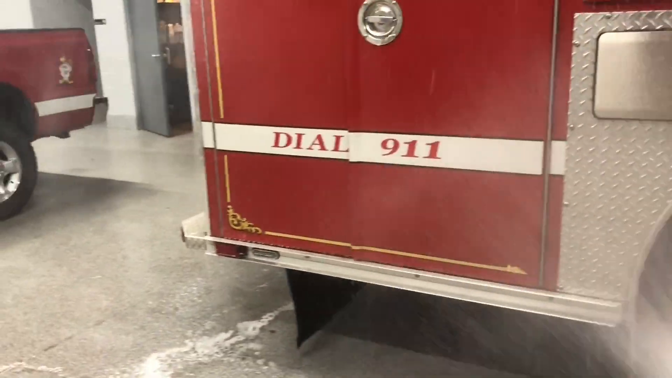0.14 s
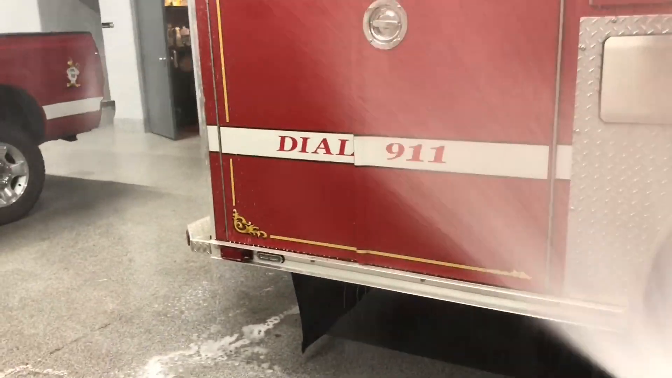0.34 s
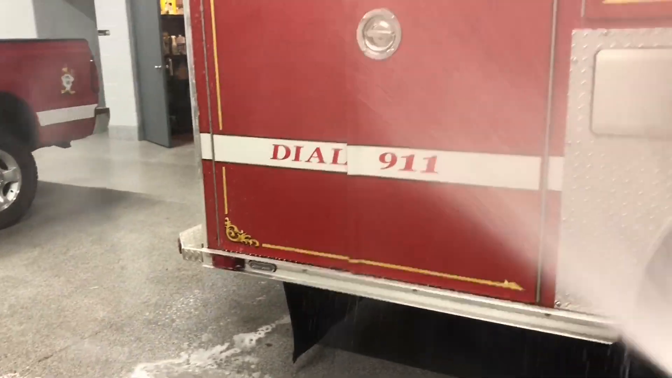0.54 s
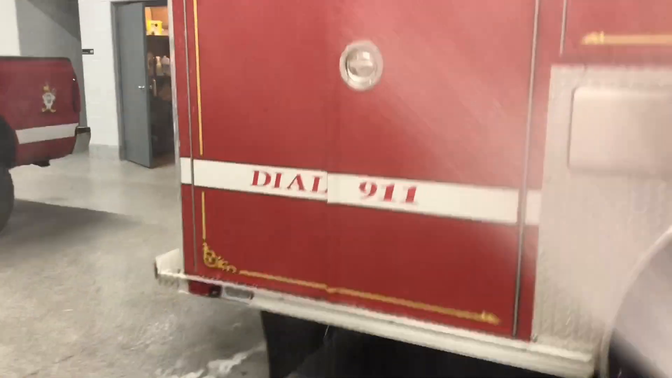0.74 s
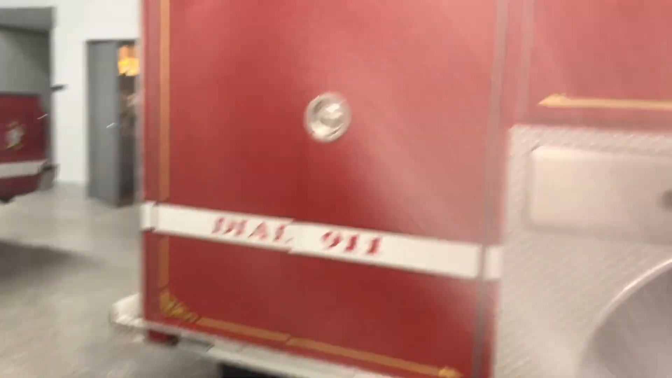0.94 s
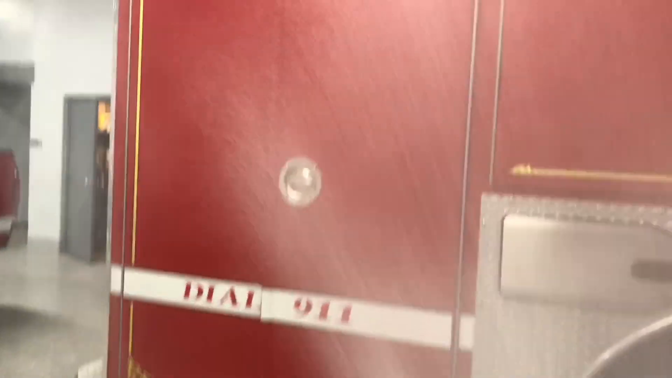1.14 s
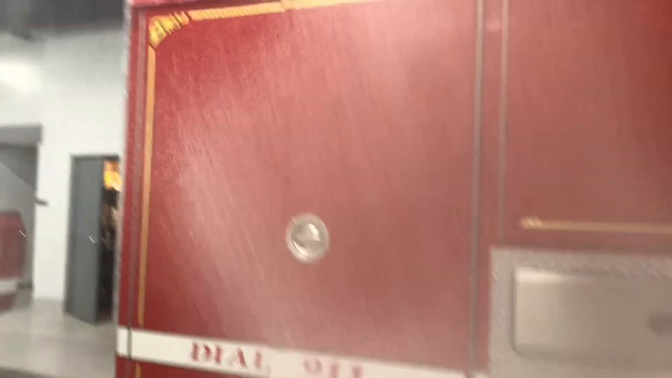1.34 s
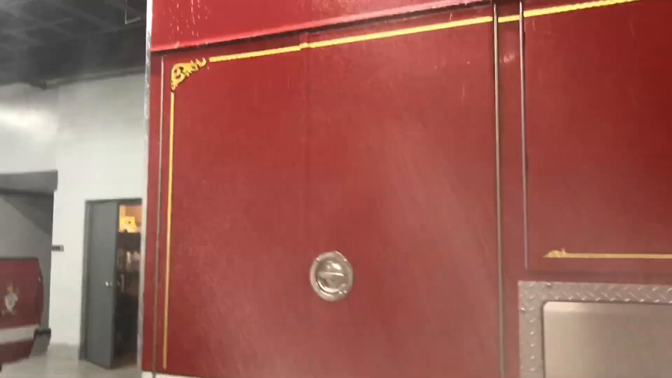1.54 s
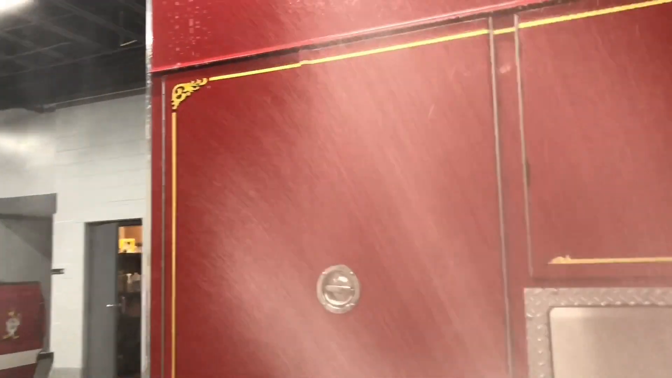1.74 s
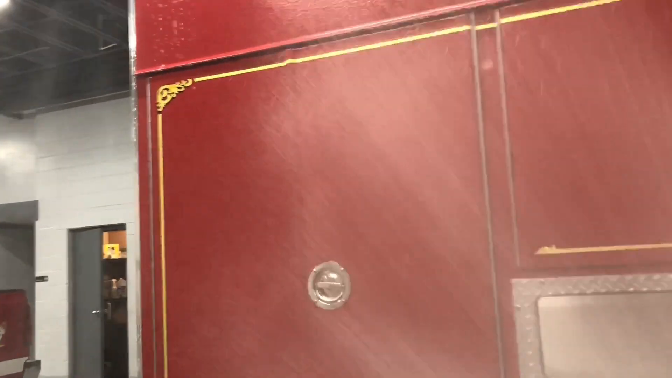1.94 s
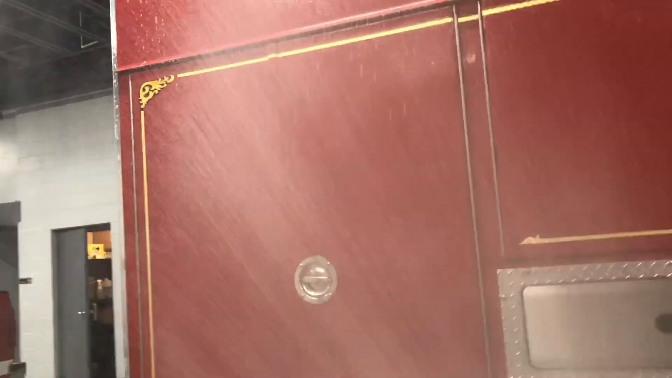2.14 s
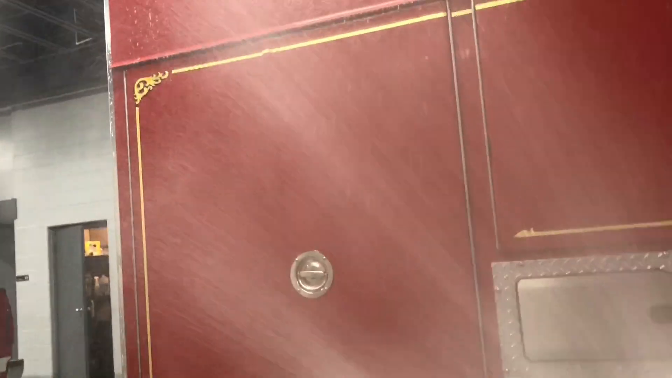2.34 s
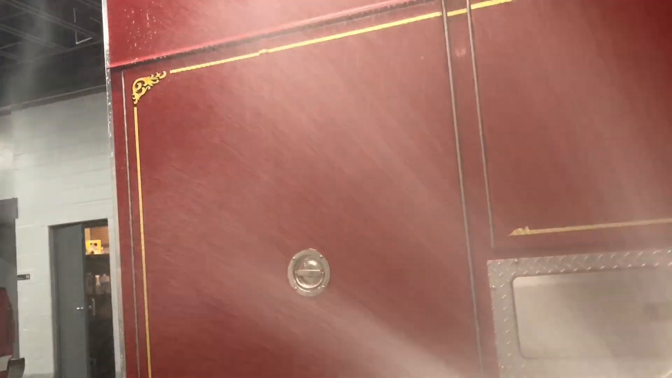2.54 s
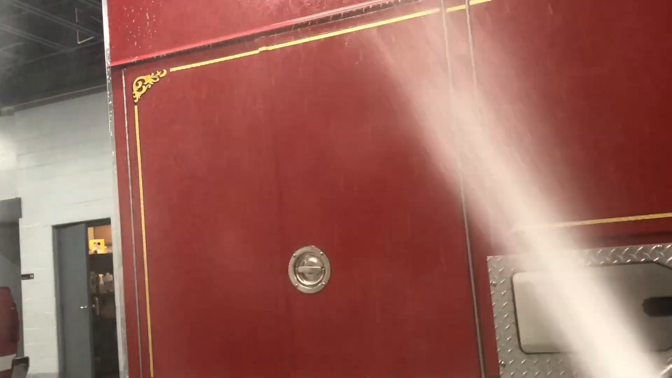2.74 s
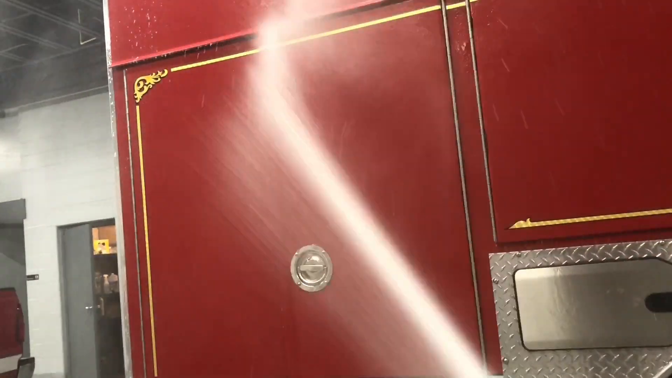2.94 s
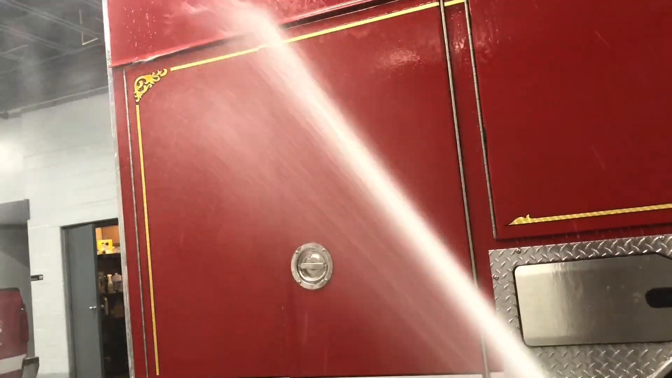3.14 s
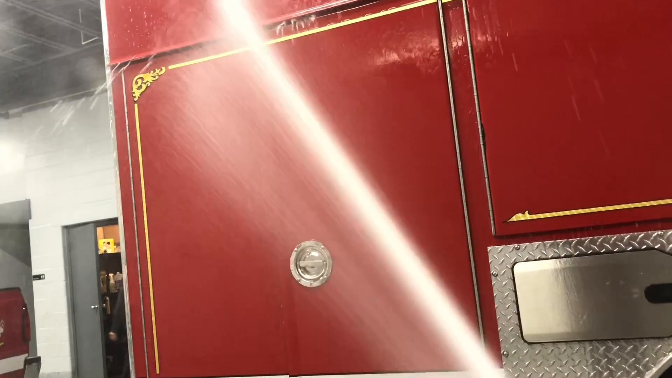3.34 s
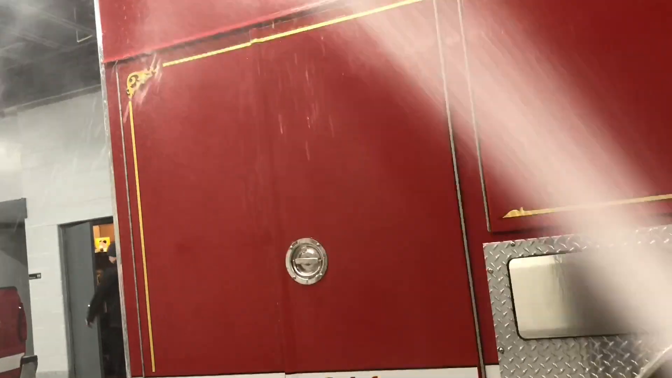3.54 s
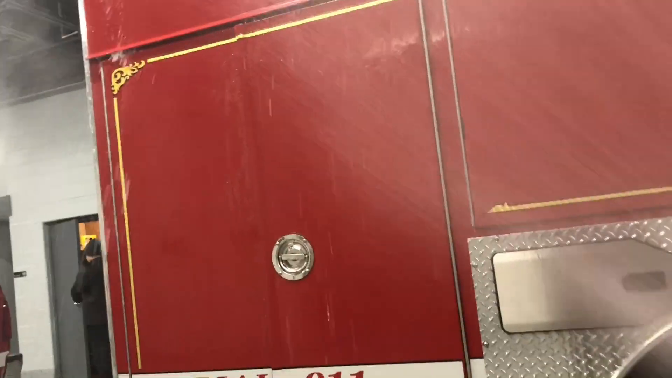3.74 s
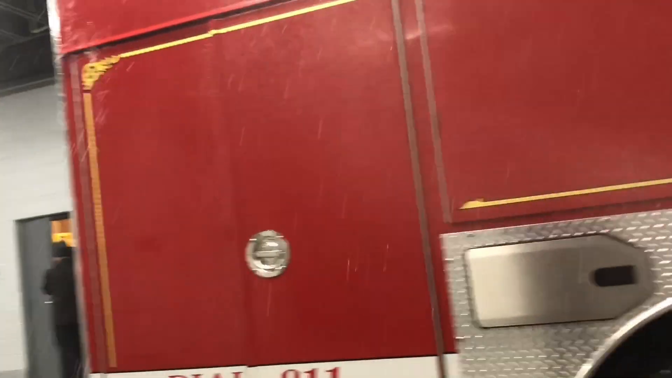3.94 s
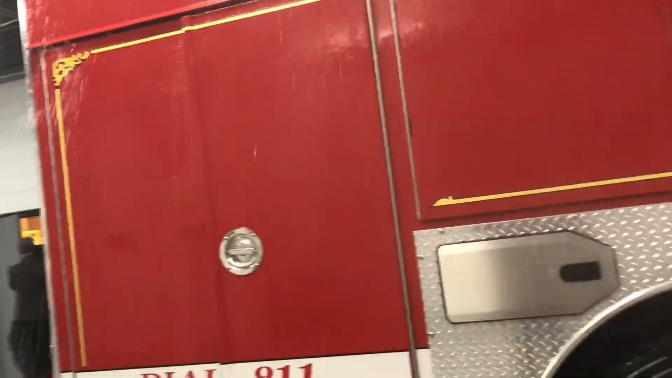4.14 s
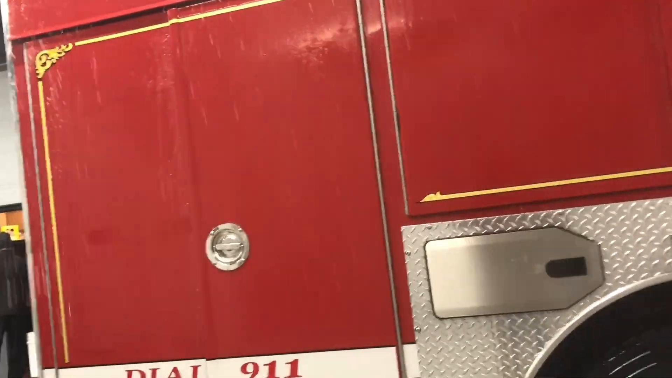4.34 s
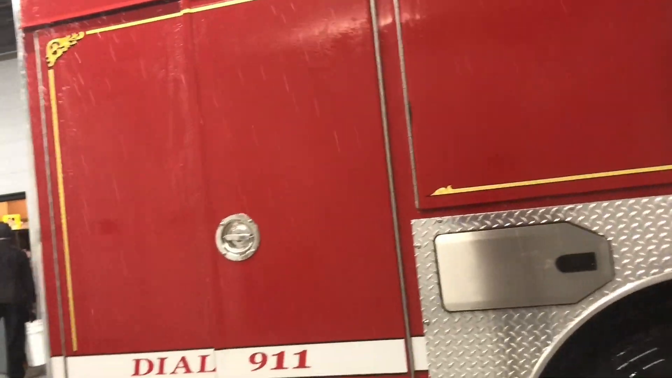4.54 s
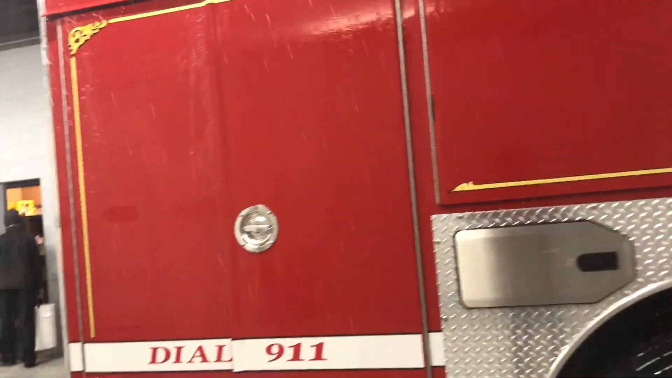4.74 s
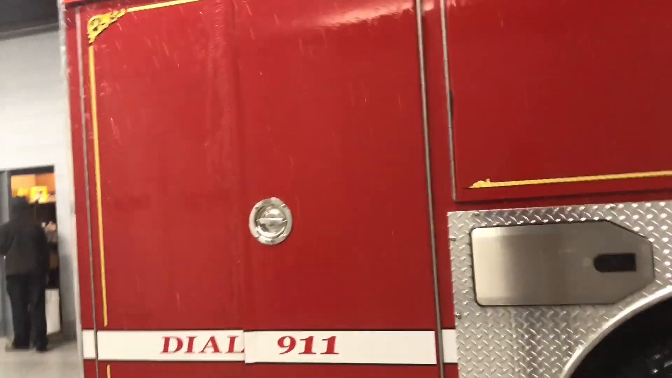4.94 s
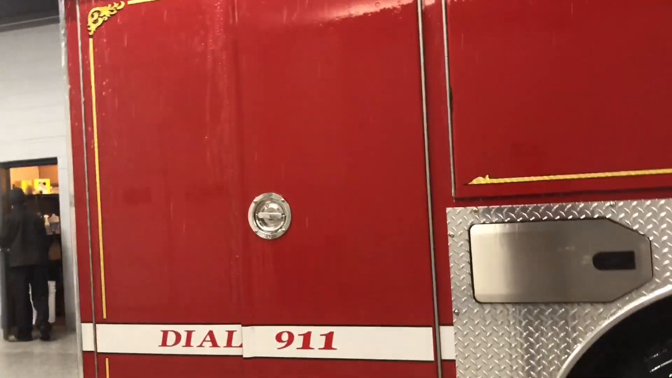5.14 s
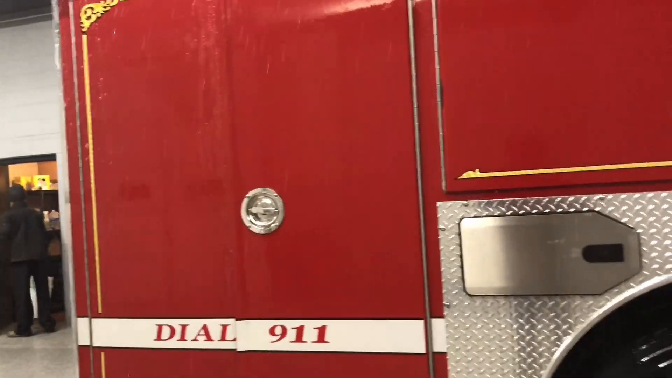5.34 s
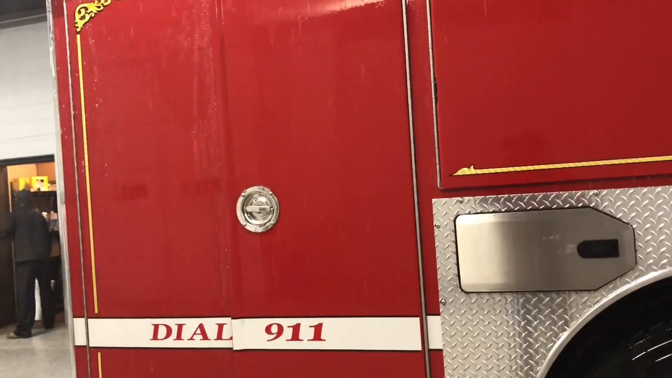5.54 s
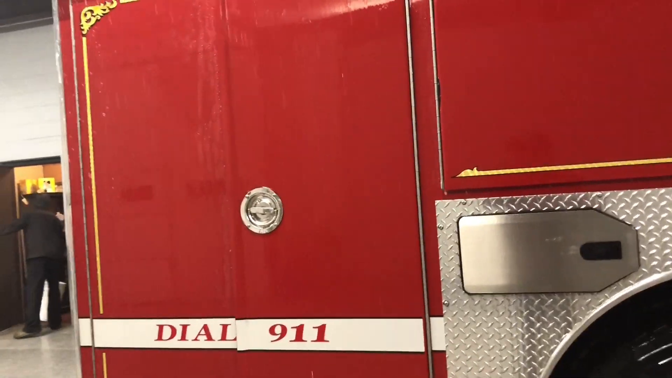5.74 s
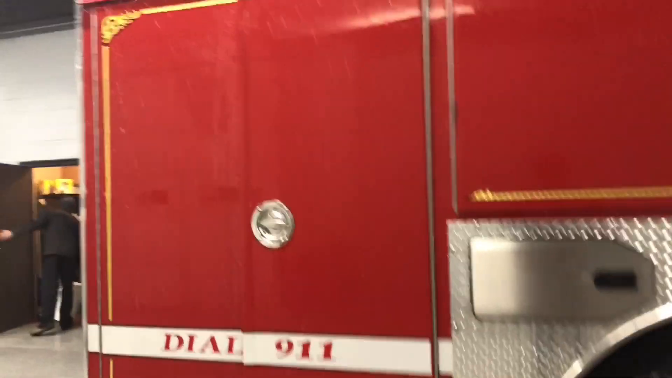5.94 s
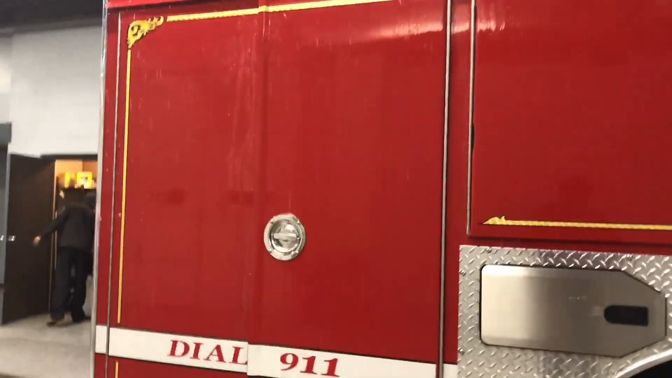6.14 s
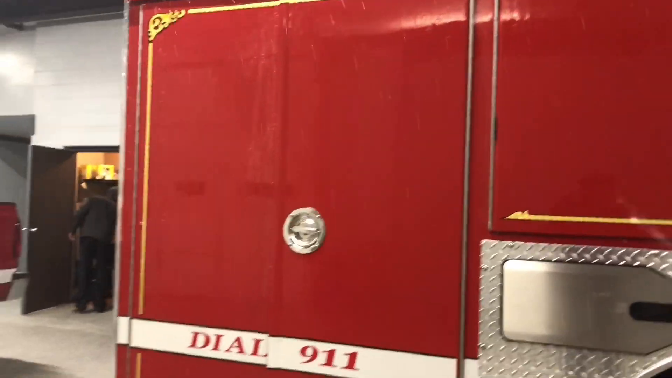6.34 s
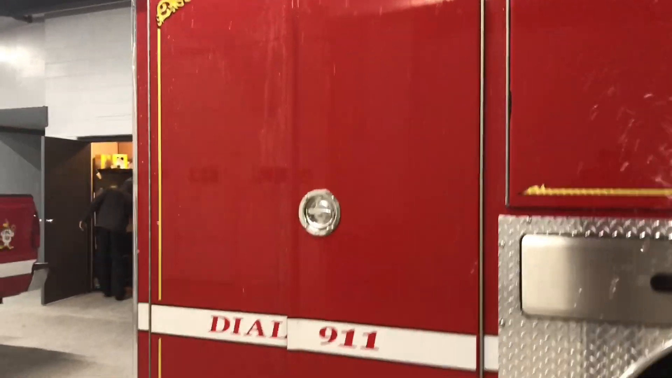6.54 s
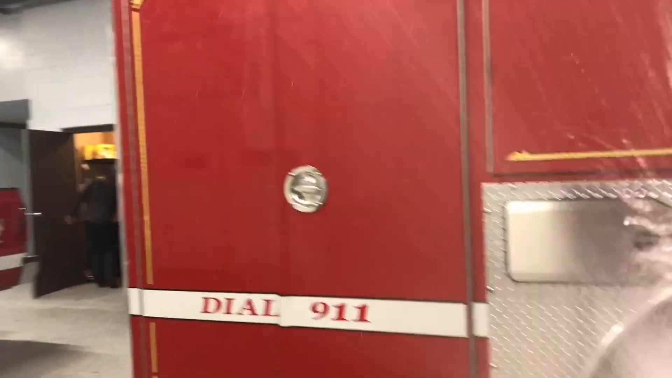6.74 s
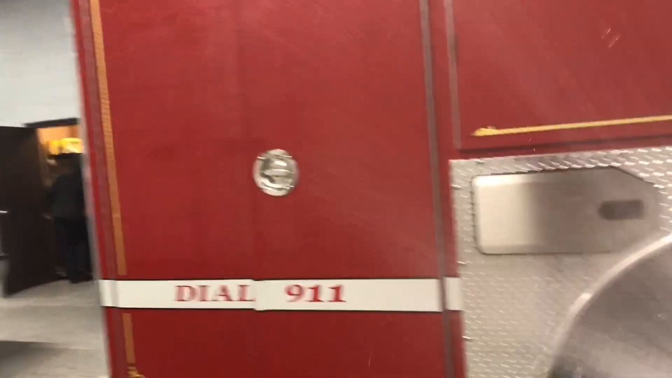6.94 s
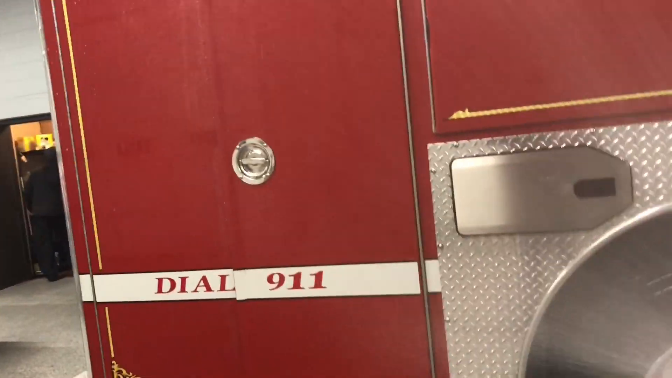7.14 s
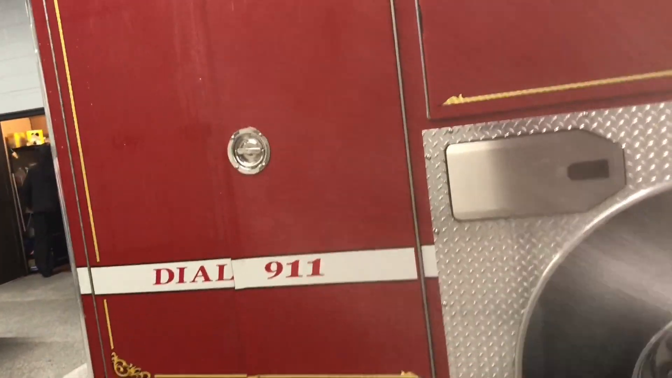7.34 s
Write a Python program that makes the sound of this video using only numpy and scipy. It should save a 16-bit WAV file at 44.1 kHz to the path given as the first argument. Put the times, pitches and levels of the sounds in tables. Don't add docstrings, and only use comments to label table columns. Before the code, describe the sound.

Close to the nozzle, a wide water fan hisses and patters on the metal side of a large vehicle, briefly drumming a hollow wheel well. It tightens into a harsher jet, spreads again and shuts off sharply. Water slumps onto the floor, drips tick and plop over quiet ventilation, dull knocks sound far off, and the spray bursts back.

```python
import sys
import numpy as np
from scipy import signal
from scipy.fft import rfft, irfft, next_fast_len
from scipy.io import wavfile
from scipy.ndimage import uniform_filter1d

SR = 44100
rng = np.random.default_rng(int(sys.argv[2]) if len(sys.argv) > 2 else 0)


def unload_audio(sound):
    columns = np.transpose(np.atleast_2d(sound))
    steps = np.round(np.clip(columns, -1, 1) * 32767)
    wavfile.write(sys.argv[1], SR, steps.astype(np.int16))


def makeup_ratio(level_db):
    decades = np.asarray(level_db, float) / 20
    return 10 ** decades


N = 329427


def clock():
    return np.arange(N) / SR


def evened(x):
    return x / np.sqrt(np.mean(x ** 2) + 1e-20)


def add(mix, s, sound):
    part = mix[round(s * SR):][:len(sound)]
    part += sound[:len(part)]


def colour(x, points):
    hz, db = np.transpose(points)
    size = next_fast_len(len(x))
    f = np.fft.rfftfreq(size, 1 / SR)
    gain = makeup_ratio(np.interp(np.log(f + 1), np.log(hz + 1), db))
    return evened(irfft(rfft(x, size) * gain, size)[:len(x)])


def follow(rows, axis=1):
    rows = np.asarray(rows)
    return np.interp(clock(), rows[:, 0], rows[:, axis], left=-120, right=-120)


def resonate(x, hz, width_hz):
    turn = np.exp(2j * np.pi * np.cumsum(hz * np.ones(len(x))) / SR)
    r = np.exp(-np.pi * width_hz / SR)
    return 2 * (turn * signal.lfilter([1 - r], [1, -r], x / turn)).real


def drops(per_s, spread_db, patchy_db, gust_db):
    size = makeup_ratio(spread_db * np.minimum(rng.exponential(1, N), 3.1)) * (rng.random(N) < per_s / SR)
    impacts = size * rng.choice([-1., 1.], N) + 0.51 * rng.standard_normal(N)
    hz, t, z = signal.stft(impacts, nperseg=256, noverlap=192)
    patches = rng.standard_normal((len(t), len(hz))).T
    patches = uniform_filter1d(patches, size=5, axis=0)
    patches = evened(uniform_filter1d(patches, size=30, axis=1))
    gusts = evened(uniform_filter1d(rng.standard_normal(len(t)), size=8))
    z = z * makeup_ratio(patchy_db * patches + gust_db * gusts)
    return signal.istft(z, nperseg=256, noverlap=192)[1][:N]


SHUT_S, OPEN_S, CLOSING_S = 3.85, 6.672, 0.0072


def flowing():
    closing = np.clip(1 - (clock() - SHUT_S) / CLOSING_S, 0, 1)
    return np.maximum(closing, clock() > OPEN_S)


# start in seconds, then the levels in dB of nozzle hiss, panel patter, mist
SETTINGS = [
    (0.0, -26.5, -31.5, -26.5, 2),
    (0.185, -27.5, -29.5, -24, 2),
    (2.615, -30, -37.5, -29.5, -4),
    (2.888, -21, -42.5, -29.5, 2),
    (3.478, -26.5, -34.5, -24, -1),
    (3.6, -26.5, -29, -24, -3),
    (5.0, -52, -54, -46, 0),
    (6.682, -31, -33.5, -28, 7.5),
]
TURN_DB_PER_S = (1210, 410, 800, 100)


def setting_db(axis):
    rows, t = np.asarray(SETTINGS), clock()[::32]
    level = np.full(len(t), rows[0, axis + 1])
    for s, step in zip(rows[1:, 0], np.diff(rows[:, axis + 1])):
        level += np.sign(step) * np.clip((t - s) * TURN_DB_PER_S[axis], 0, abs(step))
    return np.interp(clock(), t, level)


# frequency in Hz, density in dB per Hz.
HISS_TONE = [(2600, -21), (3500, -16.5), (3750, -15), (4100, -6), (4700, -5), (5300, 1), (5800, 0.5),
             (6300, -1.5), (7700, -4.5), (8700, -2), (9600, -1), (10400, -6), (13500, -9), (16000, -18)]
# frequency in Hz, density in dB per Hz.
PANEL_TONE = [(90, -25), (150, -8.5), (500, -5), (950, -3), (1250, -4.5), (1800, -3), (2300, -5),
              (3000, -2.5), (3550, -5), (3900, -1.5), (4250, -0.5), (4700, -2.5), (5400, -9.5), (6800, -54)]
# frequency in Hz, density in dB per Hz.
MIST_TONE = [(6500, -27), (8500, -1), (11000, 6.5), (13000, 3.5), (15000, 3), (16000, 0)]
# time in seconds, nearness in dB, mist blown to the microphone in dB.
SWEEPS = [
    [(0.0, -5, -2), (0.18, -5, 1), (0.42, -1, 1), (0.91, -1.5, 0), (0.97, 0, 1), (1.3, 2, -2.5),
     (1.53, -1, -3), (1.68, 2.5, -3), (1.85, -1.5, -1), (1.99, 2, 0), (2.48, 0, 0), (2.6, 2.5, -1.5),
     (2.68, -1, -1), (2.88, 1, 2), (3.47, 1, -4), (3.59, -3.5, -3.5), (3.72, 0, 1.5), (3.84, -6, -4)],
    [(6.71, 1, 3.5), (6.75, -2, 3.5), (6.875, -1, -2.5), (7.02, -3, 4), (7.237, 1, -3.5), (7.3, 1.5, -0.5),
     (7.47, 2.5, -4)],
]
PATTER_SHARE, FINEST_SHARE = 0.74, 0.4
JET_DIP_HZ, JET_DIP_WIDTH_HZ, JET_DIP = 8000, 640, 0.23
SHUT_DB = -39


def spray():
    hiss = colour(drops(20000, 3.9, patchy_db=0.66, gust_db=0.42), HISS_TONE) * makeup_ratio(2.06)
    patter = colour(drops(15000, 3.65, patchy_db=0.54, gust_db=0.58), PANEL_TONE) * makeup_ratio(1.0)
    mist = colour(drops(20000, 3.6, patchy_db=1.2, gust_db=0.7), MIST_TONE) * makeup_ratio(1.0)
    finest = signal.sosfilt(signal.butter(2, 13500, "high", fs=SR, output="sos"), mist)
    solid = (clock() > SETTINGS[3][0]) & (clock() < SETTINGS[4][0])
    hiss = hiss - JET_DIP * solid * resonate(hiss, JET_DIP_HZ, JET_DIP_WIDTH_HZ)
    s, near, blown = np.concatenate(SWEEPS).T
    near, blown = np.interp(clock(), s, near), np.interp(clock(), s, blown)
    mist = mist + (makeup_ratio(setting_db(axis=3) + FINEST_SHARE * blown) - 1) * finest
    sound = hiss * makeup_ratio(setting_db(axis=0) + near)
    sound += patter * makeup_ratio(setting_db(axis=1) + PATTER_SHARE * near)
    sound += mist * makeup_ratio(setting_db(axis=2) + near + blown)
    return sound * makeup_ratio(SHUT_DB * (1 - flowing()))


# time in seconds, level in dB, favoured resonance in Hz.
HOLLOW = [
    (0.0, -48, 284),
    (0.05, -40.5, 307),
    (0.2, -35, 323),
    (0.36, -32, 295),
    (0.52, -32.5, 296),
    (0.63, -29.5, 266),
    (0.74, -34, 265),
    (0.872, -31, 297),
    (0.97, -41.5, 276),
]
# frequency in Hz, width in Hz, level in dB.
WELL = [(184, 24, 4), (220, 37, -9), (258.4, 34, 1), (296, 46, -3.5), (332, 44, -2.5), (363, 20, 1)]
HOLLOW_END_S = 1.12


def hollow():
    rows = HOLLOW + [(HOLLOW_END_S, *HOLLOW[-1][1:])]
    aim_hz = np.clip(follow(rows, axis=2)[:2 * SR], 150, 450)
    boom = np.zeros(N)
    for air, (hz, width, db) in zip(rng.standard_normal((len(WELL), 2 * SR)), WELL):
        ring = evened(resonate(resonate(air, hz, width), hz, 3.0 * width))
        add(boom, 0, makeup_ratio(db - 7.0 * ((aim_hz - hz) / 66) ** 2) * ring)
    return boom * makeup_ratio(follow(rows) - 4.0)


# frequency in Hz, density in dB per Hz.
BAY_TONE = [(15, -63), (25, -25), (80, -7.5), (108, -2), (129, -4.5), (152, -9.5), (238, -10.5), (343, -15),
            (412, -19), (456, -19), (757, -23), (947, -20.5), (1340, -24), (2090, -24.5), (3200, -32),
            (4160, -44), (7040, -120)]
# frequency in Hz, width in Hz, level in dB.
DUCTS = [(118, 5.4, -51.5), (1000, 91, -61), (1330, 130, -57), (1547, 2.3, -65), (1700, 76, -59.5)]
# time in seconds, swell in dB, spread in seconds.
PUSHES = [
    (2.75, 2.5, 0.24),
    (3.5, 7, 0.15),
    (4.12, 3.5, 0.15),
]
BAY_DB, FLOWING_DB, IDLE_DB = -46, 1.9, 0.6


def bay():
    wash = colour(drops(10000, 1.0, patchy_db=0.6, gust_db=0), BAY_TONE)
    deep = signal.sosfilt(signal.butter(2, 420, fs=SR, output="sos"), wash)
    pushes_db = sum(db * np.exp(-((clock() - s) / spread) ** 2) for s, db, spread in PUSHES)
    swell = makeup_ratio(IDLE_DB + (FLOWING_DB - IDLE_DB) * (clock() < SHUT_S) + pushes_db)
    air = rng.standard_normal((len(DUCTS), N))
    tones = sum(makeup_ratio(db) * evened(resonate(row, hz, width)) for row, (hz, width, db) in zip(air, DUCTS))
    return makeup_ratio(BAY_DB + 0.4) * (wash + (swell - 1) * deep) + tones


# frequency in Hz, density in dB per Hz.
TRICKLE_TONE = [(1180, -10.5), (2000, -6), (3500, -1.5), (6030, 1), (9450, -2.5), (15200, -7)]
RUN_OFF_DB, GUSH_DB, GUSH_S, DRYING_DB_PER_S = -43.5, -37.5, 0.29, 2.24
ARRIVE_S, ARRIVING_S, EARLY_SHARE = 0.45, 0.12, 0.8


def trickle():
    ebb = uniform_filter1d(rng.standard_normal(N), size=1500)
    ebb = makeup_ratio(1.3 * evened(uniform_filter1d(ebb, size=1500)))
    out, t = 0.71 * ebb * rng.standard_normal(N), np.arange(64) / SR
    size = makeup_ratio(4.7 * np.minimum(rng.exponential(1, N), 3) + 1.5) * (rng.random(N) < 380 / SR)
    kind = rng.integers(0, 10, N)
    for k, hz in enumerate(np.geomspace(3500, 14500, num=10)):
        ring = np.sin(2 * np.pi * hz * t) * np.exp(-t * 5000)
        out = out + signal.oaconvolve(size * (kind == k), ring)[:N]
    since = np.maximum(clock() - SHUT_S, 0)
    arrived = EARLY_SHARE + (1 - EARLY_SHARE) * np.clip((since - ARRIVE_S) / ARRIVING_S, 0, 1)
    gush = makeup_ratio(GUSH_DB) * np.exp(-since / GUSH_S)
    run_off = arrived * makeup_ratio(RUN_OFF_DB - DRYING_DB_PER_S * since)
    return colour(out, TRICKLE_TONE) * np.hypot(gush, run_off) * (since > 0)


# frequency in Hz, density in dB per Hz.
SLUMP_TONE = [(170, -24), (280, -8), (400, -6), (550, -0.5), (750, -8), (1100, -12.5), (1500, -18.5),
              (2300, -25), (3300, -32)]
SLUMP_S, SLUMP_RISE_S = 3.924, 0.012
SLUMP_DB, SLUMP_FADE_DB_PER_S = -32.5, 48


def slump():
    t = np.maximum(clock() - SLUMP_S, 0)
    level = makeup_ratio(SLUMP_DB - SLUMP_FADE_DB_PER_S * t) * np.minimum(t / SLUMP_RISE_S, 1) ** 2
    return colour(drops(8000, 2.6, patchy_db=-1.0, gust_db=1.5), SLUMP_TONE) * level


SLAP_S, SLAP_DB, SLAP_HZ, SLAP_WIDTH_HZ = 0.009, -30.5, 596, 1100


def slap():
    out, t = np.zeros(N), np.arange(4000) / SR
    thud = resonate(rng.standard_normal(len(t)), SLAP_HZ, SLAP_WIDTH_HZ)
    thud = evened(resonate(thud, SLAP_HZ, SLAP_WIDTH_HZ))
    add(out, SLUMP_S + 0.00301, makeup_ratio(SLAP_DB) * thud * (t / SLAP_S) * np.exp(1 - t / SLAP_S))
    return out


def drip(hz, width_hz, chance):
    noise, draw = chance
    t = np.arange(len(noise)) / SR
    ring = np.sin(2 * np.pi * hz * t * (1 + 60 * t))
    ring = ring * np.exp(-t * width_hz * 2.4) * (1 - np.exp(-t / 0.00006))
    tick = noise * np.exp(-t / 0.00024)
    late = np.maximum(t - 0.0017 * makeup_ratio(2.63 * draw[0]), 0)
    bubble_hz = 5600 * makeup_ratio(1.4 * draw[1])
    bubble = np.sin(2 * np.pi * bubble_hz * late * (1 + 120 * late)) * np.exp(-late / 0.00051)
    thrown = np.convolve((draw > 2.6) * noise * np.exp(-t / 0.035), tick[:30])[:len(t)]
    sound = ring + 0.35 * tick + 0.2 * bubble + 0.1 * thrown + 0.03 * noise * np.exp(-t / 0.003)
    sound = signal.sosfilt(signal.butter(4, min(0.49 * hz, 4000), "high", fs=SR, output="sos"), sound)
    return sound / abs(sound[:40]).max()


SMALL_DB, SMALL_SPREAD_DB, SMALL_LOW_HZ, SMALL_HIGH_HZ, SMALL_WIDTH_HZ = -30, 3, 4200, 12000, 1700


def small_drips(count):
    when, size, pitch = rng.random((count, 3)).T
    s = SHUT_S + (OPEN_S - SHUT_S) * ((np.arange(count) + when) / count) ** 1.4
    db = SMALL_DB + SMALL_SPREAD_DB * (2 * size - 1)
    hz = SMALL_LOW_HZ * (SMALL_HIGH_HZ / SMALL_LOW_HZ) ** pitch
    return [(*row, SMALL_WIDTH_HZ) for row in zip(s, db, hz)]


# start in seconds, peak in dB, centre in Hz.
TICKS = [(4.0345, -23, 9500), (4.0517, -21, 12600), (4.106, -15, 11600), (4.1149, -14, 8200),
         (4.4293, -19, 12200), (4.4564, -22, 10200), (4.5475, -18, 9200), (4.6162, -18, 11700),
         (4.743, -26, 8100), (4.7813, -25, 8000), (4.8843, -25, 9300), (4.9175, -25, 9500),
         (4.9423, -23, 13300), (5.0024, -18, 8900), (5.0582, -26, 8000), (5.108, -22, 8300),
         (5.1709, -24, 8000), (5.3067, -21, 10600), (5.3258, -21, 9600), (5.383, -14, 10400),
         (5.411, -26, 14360), (5.4246, -17.5, 9100), (5.5004, -26, 10900), (5.9732, -25, 8750),
         (6.0839, -26, 9300), (6.4117, -20, 10800), (6.513, -28, 9000), (6.5878, -30, 13100),
         (6.5975, -23, 8400), (6.652, -28, 8040)]
# start in seconds, peak in dB, centre in Hz.
PLOPS = [(3.9485, -21, 6200), (3.9574, -21, 6000), (3.9596, -21, 4100), (4.1918, -25, 7600),
         (4.451, -20, 7640), (4.4937, -22, 5900), (4.618, -15.5, 5790), (4.633, -19, 5000),
         (4.6521, -22, 5300), (4.6799, -18.5, 5800), (4.754, -17, 5560), (4.8382, -24, 6400),
         (4.8505, -16, 7120), (4.899, -18, 7600), (4.9652, -22, 7100), (5.0049, -27, 6420),
         (5.1305, -24, 3800), (5.1908, -23, 6900), (5.239, -19.5, 5900), (5.3965, -31, 5900),
         (5.504, -22, 4840), (5.5758, -26, 7400), (5.6588, -20, 5600), (5.6704, -25, 4000),
         (5.7977, -23, 6700), (5.9188, -19, 6440), (6.217, -26, 6400), (6.4667, -27, 6700),
         (6.4852, -22, 4200), (6.6735, -19, 7050)]
TICK_WIDTH_HZ, PLOP_WIDTH_HZ = 2100, 2400


def drips():
    rows = [(*row, TICK_WIDTH_HZ) for row in TICKS]
    rows += [(*row, PLOP_WIDTH_HZ) for row in PLOPS]
    rows += small_drips(count=30)
    out, chance = np.zeros(N), rng.standard_normal((len(rows), 2, 1600))
    for (s, db, hz, width_hz), row in zip(rows, chance):
        add(out, s, makeup_ratio(db) * drip(hz, width_hz, row))
    t = np.arange(3000) / SR
    echo = rng.standard_normal(len(t)) * makeup_ratio(-60 * t / 0.15) * (t > 0.0015)
    return makeup_ratio(-0.3) * out + makeup_ratio(-6.5) * signal.oaconvolve(out, echo / np.linalg.norm(echo))[:N]


# frequency in Hz, density in dB per Hz.
LEAK_TONE = [(8000, -30), (11000, -8), (14000, -5), (16000, -2)]
LEAK_S, LEAK_RISE_S = 6.305, 0.02
LEAK_HOLD_DB, LEAK_PUFF_DB, LEAK_PUFF_S = -48, 8, 0.1


def leak():
    t = np.maximum(clock() - LEAK_S, 0)
    level = makeup_ratio(LEAK_HOLD_DB + LEAK_PUFF_DB * np.exp(-t / LEAK_PUFF_S)) * np.minimum(t / LEAK_RISE_S, 1)
    return colour(rng.standard_normal(N), LEAK_TONE) * level


# start in seconds, peak in dB, frequency in Hz, 60 dB decay time in seconds.
KNOCKS = [
    (6.373, -20.5, 130, 0.11),
    (6.407, -24, 123, 0.21),
    (6.461, -26, 118, 0.3),
]


def knocks():
    out, t = np.zeros(N), np.arange(SR // 2) / SR
    puffs = rng.standard_normal((len(KNOCKS), len(t)))
    for (s, db, hz, t60), puff in zip(KNOCKS, puffs):
        dull = evened(resonate(resonate(puff, 180, 140), 180, 200)) * np.exp(-t / 0.058)
        level = makeup_ratio(db - 60 * t / t60) * (1 - np.exp(-t / 0.0059))
        add(out, s, level * (np.sin(2 * np.pi * hz * t) + 0.21 * dull))
    return out


# delay in seconds, level in dB.
NEAR = [(.0031, -44), (.0073, -32), (.0118, -26.5), (.019, -30.5), (.027, -21)]


def mirrored(x):
    out = x.copy()
    for k, (s, db) in enumerate(NEAR):
        add(out, s, (-1) ** k * makeup_ratio(db) * x)
    return out


def scene():
    mono = mirrored(spray() + slump()) + hollow() + bay() + trickle() + slap() + drips() + leak() + knocks()
    return np.array([mono, mono])


def low_pass(x):
    return signal.sosfilt(signal.butter(12, 17060, fs=SR, output="sos"), x)


def record(dry):
    thin = signal.sosfilt(signal.butter(3, 42, "high", fs=SR, output="sos"), dry)
    steep = signal.firwin(1601, 15750, window=("kaiser", 9), fs=SR)
    limited = signal.oaconvolve(thin, steep[None], "same")
    return low_pass(limited)


dry = scene()
out = record(dry)
unload_audio(out)
```